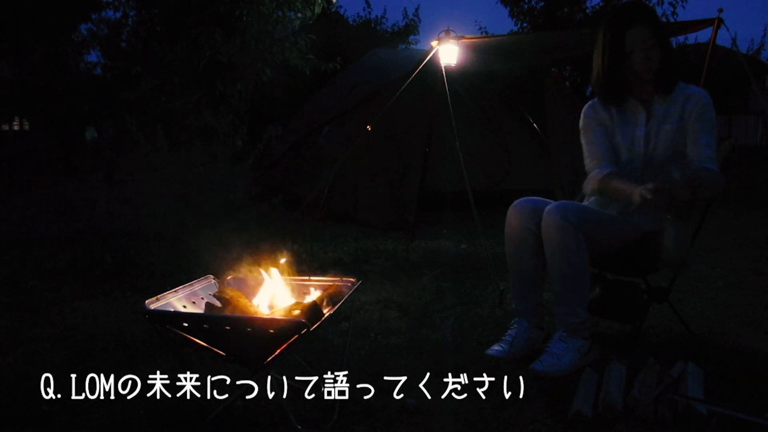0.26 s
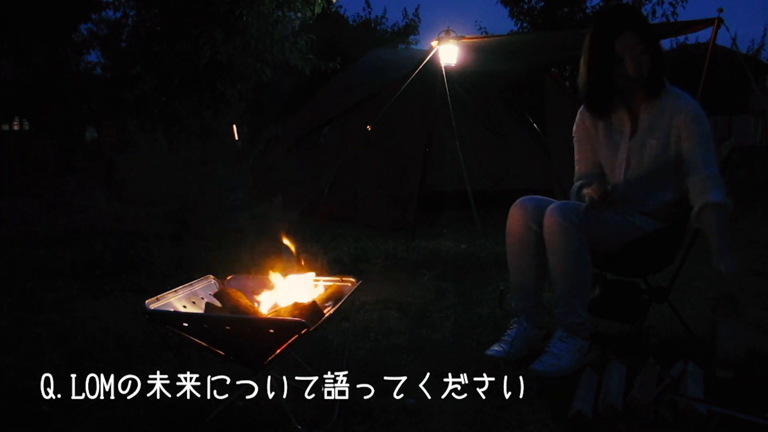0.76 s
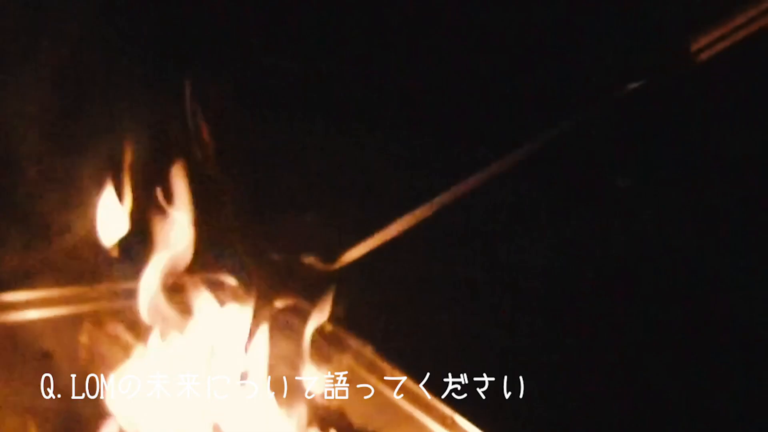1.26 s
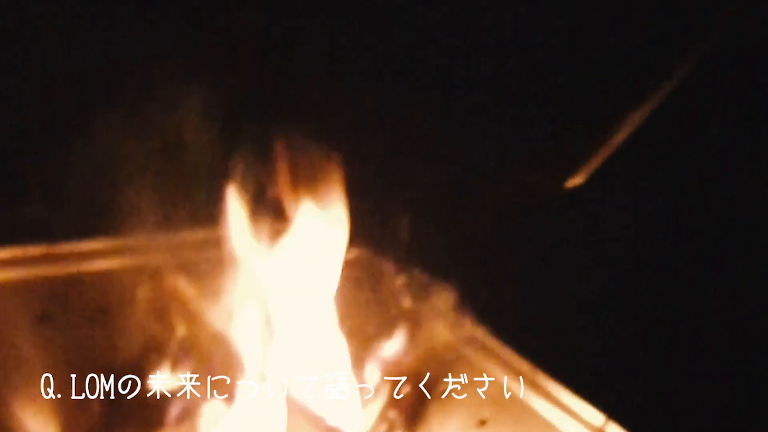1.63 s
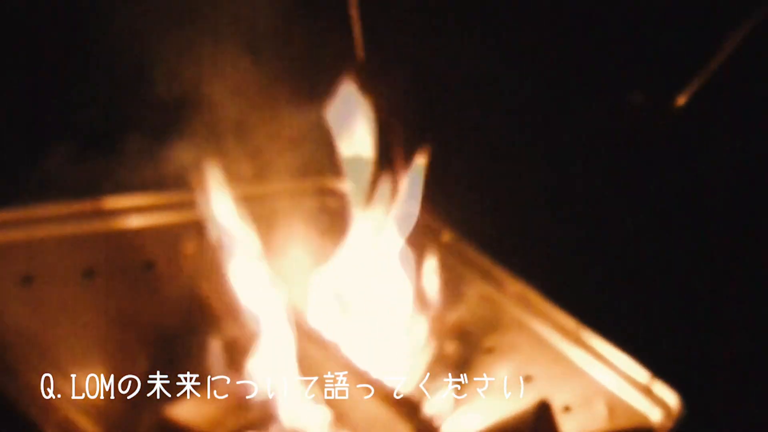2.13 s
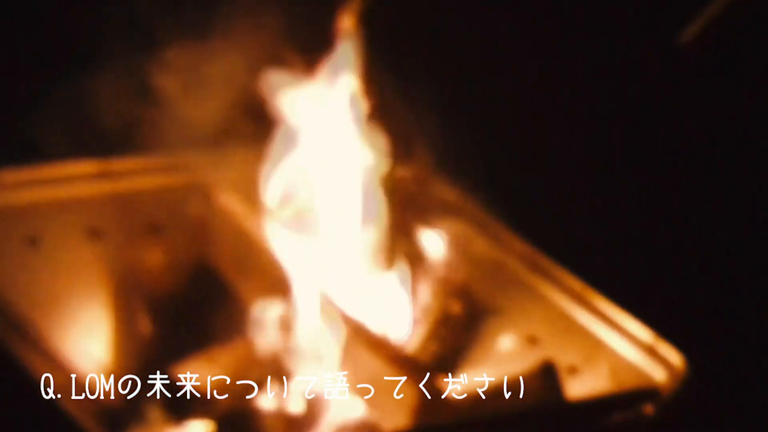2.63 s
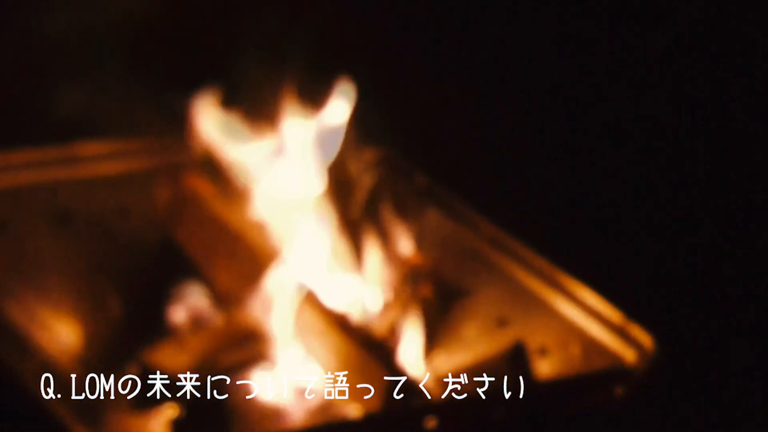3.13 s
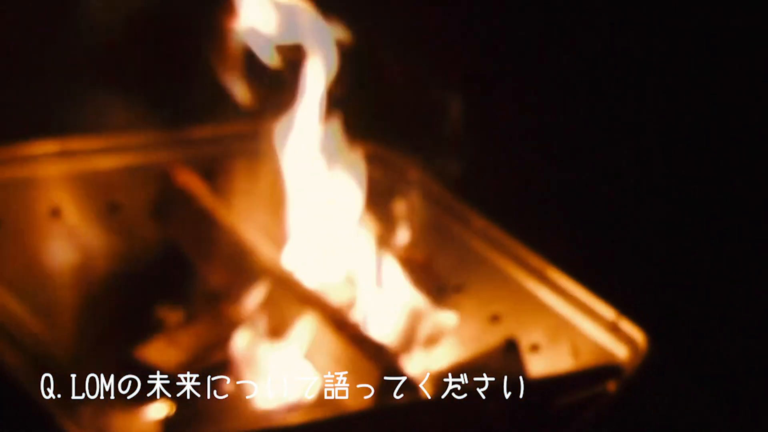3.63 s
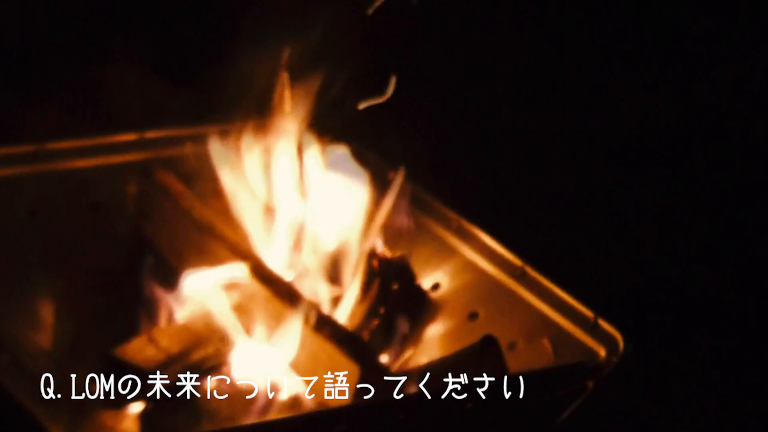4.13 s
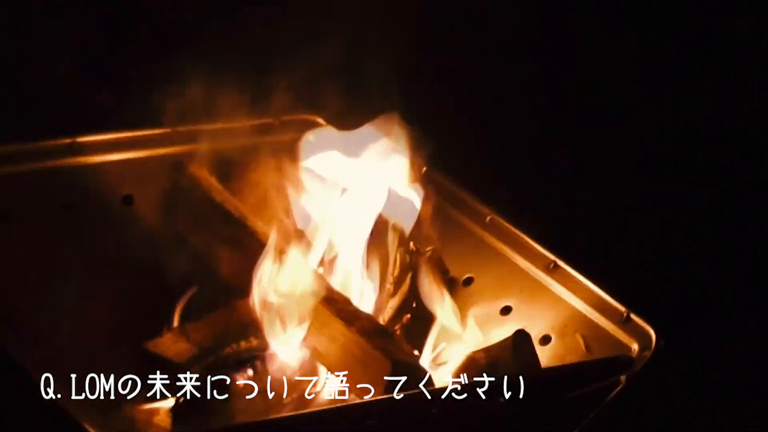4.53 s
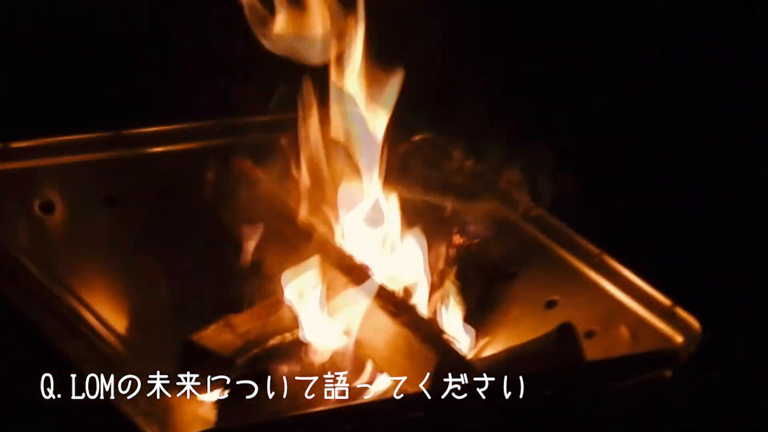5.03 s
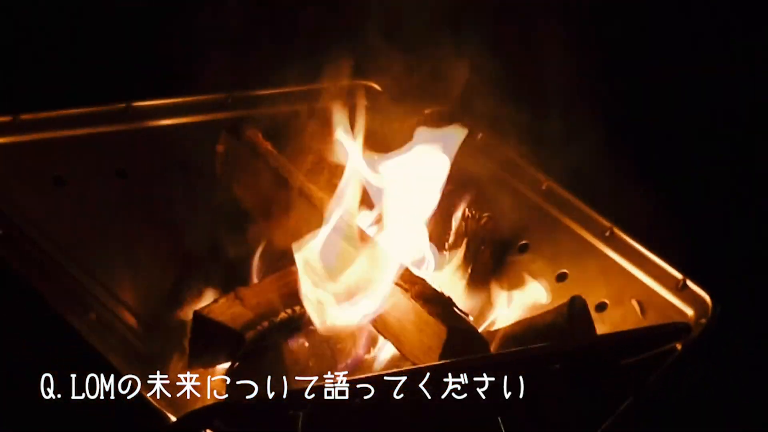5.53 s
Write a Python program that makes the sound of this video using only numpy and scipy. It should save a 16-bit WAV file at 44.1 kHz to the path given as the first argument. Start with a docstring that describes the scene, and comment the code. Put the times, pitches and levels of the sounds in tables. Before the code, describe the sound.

A close, dry campfire: low uneven rumbling, airy rushing, thin bright fizz and constant tiny crackles. Pops cluster in the first two and a half seconds, thin out while a nearby cricket gives nine quick high trills, then return as a few loud snaps near the end. Open campsite, only a very short scattered reflection, with microphones near the flames.

```python
"""At a campsite at night, split logs burn in a steel fire pit, heard close up in stereo.
Flames rumble, flutter and rush: shaped noise with slowly changing levels. Steam hisses and embers tick:
steady noise and random fading puffs. Wood bursts in sharp pops of filtered noise with a brief ringing tone.
The charred skin splits in bright ticks, and one tongue of flame flares up.
For about two seconds a field cricket chirps nearby: runs of short falling tones."""
import sys
import numpy as np
from scipy import signal
from scipy.fft import rfft, irfft, next_fast_len
from scipy.io import wavfile
from scipy.ndimage import map_coordinates

SR = 44100
rng = np.random.default_rng(int(sys.argv[2]) if len(sys.argv) > 2 else 0)


def bounce(signal):
    """Save signal as a 16-bit WAV file at the path given by the first command-line argument."""
    frames = np.transpose(np.atleast_2d(signal))
    limited = np.clip(frames, -1, 1)
    pcm = np.round(limited * 32767).astype(np.int16)
    wavfile.write(sys.argv[1], SR, pcm)


N = 255020

# How strong the flames are over time, before the fixed shifts in flames().
# Each row: time in seconds, rumble level in dB, flutter level in dB.
FLAME_STRENGTH = [(0.0, -44.5, -50), (0.58, -41.5, -52.5), (0.66, -48, -47), (0.72, -40.5, -52.5),
                  (1.13, -41.5, -47), (1.43, -50, -57), (1.63, -43.5, -52.5), (2.74, -44, -52.5),
                  (2.86, -46, -58.5), (2.96, -41.5, -52.5), (3.9, -44, -54), (3.99, -41.5, -50.5),
                  (4.54, -48.5, -60), (4.7, -44, -49), (4.89, -43.5, -54), (5.12, -48, -53),
                  (5.2, -44, -50.5), (5.78, -44, -50.5)]
# Tone colours of the three flame layers. Each row: frequency in Hz, relative level in dB per Hz.
RUMBLE_COLOUR = [(10, 0), (20, -1.5), (36, 1), (56, -7), (86, -16), (110, -18.5), (150, -61.5)]
FLUTTER_COLOUR = [(60, -66), (95, -6.5), (115, -0.5), (145, 0), (175, -7.5), (240, -13.5), (330, -20),
                  (500, -26.5), (1000, -90)]
RUSH_COLOUR = [(150, 3.5), (300, -0.5), (550, 3), (1000, 2), (1600, -2), (2600, -3.5), (4000, -5.5),
               (8000, -42)]


def flames(rush_db):
    """Turbulent burning gas: a deep rumble, a flutter above it and a soft, uneven rush."""
    rumble_db, flutter_db = curves(FLAME_STRENGTH)
    centred = [(30, .994), (120, .997)]  # left and right are almost the same
    rumble = amp(rumble_db + 3.5) * stereo(noise(), RUMBLE_COLOUR, centred)
    flutter = amp(flutter_db + 0.23) * stereo(noise(), FLUTTER_COLOUR, centred)
    rush_level = amp(rush_db - 0.8 + 1.7 * wobble(12))
    rush = rush_level * stereo(noise(), RUSH_COLOUR, [(300, 0.89), (2500, 0.98)])
    return rumble + flutter + rush


# Bursts in the logs, plus two bright splits of the charred skin (at 1.8983 s and 2.5697 s) played the same way.
# # Each row: start in seconds, level of the snap in dB over 10 ms, # brightness in dB (lifts the crack and
# lowers the knock), ring frequency in Hz, # ring level above the snap in dB, level of the spit of steam in dB
# over 10 ms.
LOG_POPS = [(.1482, -57, -9.5, 1410, 3.5, -57), (0.3182, -46, 0.5, 1410, 5.5, -53),
            (0.3811, -49.5, 8, 1580, -4, -47), (0.6936, -42.5, 0.5, 2300, -10.5, -61),
            (1.0286, -45.5, -1.5, 1270, 1.5, -54), (1.1285, -51, -8.5, 1430, 11, -69),
            (1.176, -53, 3, 1350, -2, -59), (1.1922, -60.5, 13, 3840, 11, -53),
            (1.2109, -60, -2, 2950, 4, -70), (1.251, -57, -5, 1240, 2.5, -74),
            (1.399, -65, 6, 2180, 5.5, -63), (1.4392, -57, -4, 2210, -8, -58),
            (1.744, -61.5, -6, 573, 5.5, -74), (1.8983, -46.5, 13.5, 4770, 2, -34),
            (1.9362, -48.5, 1.5, 916, 6, -60), (1.991, -39, 8, 3850, 1.5, -43.5),
            (2.2266, -43.5, -2, 2670, -1.5, -71), (2.407, -46.5, 1.5, 1475, 1, -52),
            (2.42, -51, 6, 3140, 3, -58), (2.5681, -56, -14, 564, 11, -70),
            (2.5697, -49.5, 16.5, 1780, 2, -35), (2.8898, -52.5, -0.5, 1340, 5, -55),
            (2.9626, -51, -3, 3980, -15, -58), (3.7635, -61, 0, 1700, 2, -60),
            (3.8866, -53.5, 10, 970, 3, -55), (4.021, -59.5, -10, 1480, 2.5, -72),
            (4.9292, -51.5, 0, 2520, 5, -57), (4.9466, -41.5, 5.5, 2430, -3, -57),
            (5.2696, -39, 5, 2240, -1, -63), (5.553, -42, -1.5, 1370, 6.5, -52),
            (5.5988, -57.5, 10, 4600, 7, -58)]


def logs():
    """Brightness tips each pop from a dull knock to a sharp crack; each rings its own part of the log."""
    out = np.zeros((2, N))
    arch_db = 4.5  # at zero brightness, knock and crack lie this far under the snap between them
    for start_s, snap_db, bright_db, ring_hz, ring_over_db, spit_db in LOG_POPS:
        knock_db = snap_db - arch_db - bright_db
        crack_db = snap_db - arch_db + bright_db
        band_db = (knock_db, snap_db, crack_db, spit_db)
        burst_log = pop(ring_hz, snap_db + ring_over_db, band_db,
                        tear_s=0.0014, ring_cycles=1.44, kick=3.1, spit_rise_s=0.0004)
        add(out, start_s, camp(burst_log, wet_db=-11.5))
    return out


# The four parts of a pop: knock, snap, crack and spit. Each row: lowest Hz, highest Hz.
POP_PARTS_HZ = [(230, 950), (900, 2600), (2500, 7000), (10000, 15800)]


def pop(ring_hz, ring_db, band_db, tear_s, ring_cycles, kick, spit_rise_s):
    """A pocket of steam bursts: a kick, a millisecond of tearing fibres, a spit of steam and a brief ring."""
    t = np.arange(SR // 20) / SR
    out = np.zeros((2, len(t)))
    tearing = np.exp(-t / tear_s)
    spitting = t / spit_rise_s * np.exp(-t / spit_rise_s)
    shapes = (tearing, tearing, tearing, spitting)
    kicks = (kick, kick, kick / 2, 0)
    widths = (.06, .25, .55, .85)  # the higher the band, the less alike are left and right
    for edges, db, shape, push, width in zip(POP_PARTS_HZ, band_db, shapes, kicks, widths):
        mid, side = rng.standard_normal((2, len(t))) * shape
        mid[0] += push
        left_right = [mid + width * side, mid - width * side]
        band = signal.butter(4, edges, 'band', fs=SR, output='sos')
        out += amp(db) * burst(signal.sosfilt(band, left_right))
    # the ring fades over a few cycles, so low pops last longer than high ones
    fade = np.exp(-t * ring_hz / ring_cycles)
    soft_start = 1 - np.exp(-t / 0.00084)
    ring = np.sin(2 * np.pi * ring_hz * t) * fade * soft_start
    return out + amp(ring_db) * burst(ring)


# Tone colour of the steam. Each row: frequency in Hz, relative level in dB per Hz.
STEAM_COLOUR = [(900, -20), (2500, -5), (3600, -2), (5200, 2), (7000, -2.5), (8300, -6.5), (9400, -8.5),
                (11500, -1), (14500, 1.5), (15900, -8)]
# How alike left and right are in the steam. Each row: frequency in Hz, likeness from 0 to 1.
STEAM_ALIKE = [(1000, 0.097), (3000, 0.27), (5500, 0.25), (9000, 0.06), (13000, 0.15)]


def embers(rush_db, hiss_db):
    """Steam fizzes out of the grain while embers tick: brightly at the surface, duller inside the wood."""
    fizz = unit(noise() + ticks(rate=330, spread_db=8.5, life_s=0.003))
    steam_level = amp(hiss_db + 2.0 + 0.62 * wobble(16))
    steam = steam_level * stereo(fizz, STEAM_COLOUR, STEAM_ALIKE)

    fine_colour = [(4000, -37), (6500, 0), (8800, -14), (11500, 0), (15500, -3.5)]
    fine = stereo(ticks(rate=63, spread_db=14, life_s=0.00089), fine_colour, [(6000, .5), (12000, .1)])

    crackle_colour = [(1200, -35), (2800, 4.5), (4500, 2.5), (6500, -2.0), (9000, -36)]
    crackle = stereo(ticks(rate=47, spread_db=11.5, life_s=0.0011), crackle_colour,
                     [(2000, 0.97), (6000, 1.0)])

    woody_colour = [(200, 13), (700, -7.5), (1400, -1), (2500, -9), (4500, -20), (9000, -14.5)]
    woody = stereo(ticks(rate=30, spread_db=19.5, life_s=0.004), woody_colour,
                   [(1000, 0.96), (5000, 0.22)])
    return steam + amp(hiss_db - 5.5) * fine + amp(rush_db - 4.0) * crackle + amp(rush_db - 2) * woody


# Bright ticks of the charred skin.
# Each row: time in seconds (the puff begins 0.92 ms later), strength in dB before an 8 dB cut.
SKIN_SPLITS = [(0.3025, -42), (0.4924, -38), (0.8712, -38.5), (1.0934, -41), (1.788, -36.5),
               (1.8234, -36.5), (1.8527, -39), (2.5413, -39.5), (2.6433, -39), (2.7168, -34), (2.7652, -37),
               (3.1519, -38.5), (3.4203, -36.5), (3.8625, -38.5), (4.0483, -34.5), (4.2556, -37.5),
               (4.592, -35.5), (4.8888, -39), (5.6794, -40)]


def splits():
    """The charred skin splits: a short bright puff of noise each time."""
    out = np.zeros((2, N))
    t = np.arange(SR // 50) / SR
    for s, db in SKIN_SPLITS:
        shape = np.exp(-t / 0.00041) * (1 - np.exp(-t / 0.000073))
        puff = rng.standard_normal((2, len(t))) * shape
        add(out, s + 0.00092, camp(amp(db - 8.0) * burst(puff), wet_db=-4))
    colour = [(500, -8), (2000, -7.0), (5500, -1.0), (8800, -15.5), (11500, 1.0), (15000, 1.5)]
    # colouring changes the overall level, so it is set back to what it was
    return np.std(out) * stereo(out, colour, [(2000, 0.98), (7000, .5), (13000, .1)])


# Tone colour of the flare. Each row: frequency in Hz, relative level in dB per Hz.
FLARE_COLOUR = [(220, -22), (400, -7), (520, 4), (780, -14), (1150, -4), (1550, -12), (3000, -22)]


def flare():
    """A tongue of flame swells quickly, sinks more slowly and rustles unevenly."""
    peak_s, peak_db = 0.96, -54  # the peak before the uneven rustle
    rise_db_per_s, fall_db_per_s = 120, 65
    t = np.arange(N) / SR - peak_s
    level_db = peak_db + np.minimum(rise_db_per_s * t, -fall_db_per_s * t)
    return amp(level_db + 2.9 * wobble(56.0)) * stereo(noise(), FLARE_COLOUR, [(500, 1.0)])


# The cricket's chirps. Each row: time in seconds (the first stroke begins 2.4 ms earlier),
# number of wing strokes (a fraction means a weak last stroke).
CRICKET_CHIRPS = [(2.433, 4.25), (2.681, 7), (2.947, 7), (3.21, 7), (3.461, 6), (3.709, 6), (3.975, 6),
                  (4.253, 6), (4.544, 5)]


def cricket(period_s=.0206):
    """Each chirp is a run of wing strokes; the first are softer, shorter and lower, most in early chirps."""
    out = np.zeros((2, N))
    full_db, warm_up_s = -35.5, 0.51  # the cricket starts timidly and finds its full voice
    for s, strokes in CRICKET_CHIRPS:
        timid = np.exp(-(s - CRICKET_CHIRPS[0][0]) / warm_up_s)
        chirp_db = full_db - 1.5 * timid
        soft_db = 8 + 7 * timid  # how much softer the first stroke is
        swell_strokes = 0.62 + 1.1 * timid
        for k in range(int(np.ceil(strokes))):
            slack = np.exp(-k / swell_strokes)  # 1 at the first stroke, then fading
            tone = wing_stroke(.0146 - .002 * slack, 4275 - 170 * slack, 750 - 200 * slack)
            stroke_db = chirp_db - soft_db * slack + rng.normal(0, 0.54)
            level = min(1, strokes - k) * amp(stroke_db)
            left_right = amp([[.3], [-.3]])  # slightly to the left
            add(out, s - .006 + k * period_s + 0.0036 * slack, level * tone * left_right)
    return camp(out, wet_db=-15.0)[:, :N]


def wing_stroke(length_s, start_hz, fall_hz):
    """The scraper runs along the file and slows down, so the tone falls; it carries a faint octave."""
    u = np.linspace(0, 1, int(length_s * SR))  # progress through the stroke
    # the whole fall is 1.102 times fall_hz
    hz = start_hz * (1 + rng.normal(0, 0.0053)) - fall_hz * (0.672 * u + 0.43 * u ** 2)
    grip = np.interp(u, [0, .1, .28, .55, .78, 1], [0.16, 0.4, 0.77, 0.98, 0.53, 0.11])
    uneven_db = 1.2 * np.interp(u, np.linspace(0, 1, num=8), rng.standard_normal(size=8))
    grip *= amp(uneven_db)  # the teeth catch unevenly
    phase = 2 * np.pi * np.cumsum(hz) / SR
    return grip * (np.sin(phase) + amp(-29.5) * np.sin(2 * phase))


# How fast the answer from the pit, the ground and the tent dies away.
# Each row: frequency in Hz, time to fall by 60 dB in seconds.
CAMP_FADE = [(300, 0.079), (1500, 0.056), (6000, 0.045), (14000, 0.041)]


def camp(x, wet_db):
    """Adds a short scattered answer, drawn anew each time, whose treble dies away sooner than its bass."""
    hz, t, z = signal.stft(rng.standard_normal((2, SR // 8)), SR, nperseg=128)
    fade = amp(-60 * t / along(CAMP_FADE, hz)[:, None])
    mid, side = signal.istft(z * fade, SR, nperseg=128)[1]
    tail = np.array([mid + .5 * side, mid - .5 * side])
    tail *= 1 - np.exp(-np.arange(tail.shape[1]) / SR / 0.0022)  # the answer builds up softly
    answer = amp(wet_db) * tail / np.linalg.norm(tail[0])
    answer[:, 0] += 1  # the direct sound
    return signal.fftconvolve(x, answer, axes=1)


def amp(db):
    """Decibels to gain."""
    return 10 ** (np.asarray(db) / 20)


def unit(x):
    """Scale to an rms (average strength) of 1."""
    return x / np.sqrt(np.mean(x ** 2) + 1e-20)


def burst(x):
    """Scale a short sound to the energy of 10 ms at rms 1."""
    return unit(x) * np.sqrt(.01 * SR / x.shape[-1])


def along(points, hz):
    """Read (Hz, value) points at any frequency, on a log axis."""
    f, v = np.transpose(points)
    return np.interp(np.log(hz + 1), np.log(f + 1), v)


def curves(rows):
    """One value per sample for each column after the time."""
    s, *columns = np.transpose(rows)
    return [np.interp(np.arange(N) / SR, s, c) for c in columns]


def wobble(rate):
    """A smooth random curve with rate random points a second."""
    knots = rng.standard_normal(int(N * rate / SR) + 4)
    return map_coordinates(knots, [np.arange(N) * rate / SR])


def filtered(x, response):
    """Multiply the spectrum of x by a response that depends on frequency."""
    m = next_fast_len(N + SR // 2)
    return irfft(rfft(x, m) * response(np.fft.rfftfreq(m, 1 / SR)), m)[..., :N]


def stereo(pair, spectrum, alike):
    """Two unrelated signals become a coloured left and right of rms 1, as alike as asked at each frequency."""
    def response(hz):
        """The shares of mid and side set how alike left and right are."""
        turn = np.arccos(np.clip(along(alike, hz), -1, 1)) / 2
        return amp(along(spectrum, hz)) * [np.cos(turn), np.sin(turn)]

    mid, side = filtered(pair, response)
    return unit(np.array([mid + side, mid - side]))


def noise():
    """Two unrelated white noises."""
    return rng.standard_normal((2, N))


def ticks(rate, spread_db, life_s):
    """Random puffs of noise, about rate a second, most small and some larger, fading over life_s seconds."""
    size = amp(spread_db * rng.random(N) ** 2)
    starts = (rng.random(N) < rate / SR) * size
    fading = signal.lfilter([1], [1, -np.exp(-1 / (life_s * SR))], starts)
    return unit(fading * noise())


def add(track, s, sound):
    """Mix a sound in at time s."""
    part = track[:, max(round(s * SR), 0):][:, :sound.shape[1]]
    part += sound[:, :part.shape[1]]


# The slow course of the burning, before the fixed shifts of each layer.
# Each row: time in seconds, rush of gas in dB, steam from the wood in dB.
BURNING = [(0.0, -59.5, -55), (0.4, -58.5, -55.5), (1.13, -60, -56), (1.41, -61.5, -56), (1.77, -64.5, -60),
           (3.67, -61.5, -57), (4.17, -63, -57.5), (4.67, -63, -60), (5.33, -61.5, -59), (5.78, -62, -58)]


def scene():
    """The fire and the cricket together; the gas and the steam also set the level of the ticking embers."""
    rush_db, hiss_db = curves(BURNING)
    fire = flames(rush_db) + logs() + embers(rush_db, hiss_db) + splits() + flare()
    return fire + cricket()


def record(dry):
    """The recorder keeps nothing above its band limit, with a 200 Hz wide slope around 16 kHz."""
    top_hz = 16000
    return filtered(dry, lambda hz: np.clip((top_hz - hz) / 200 + .5, 0, 1))


dry = scene()
out = record(dry)
bounce(out)
```